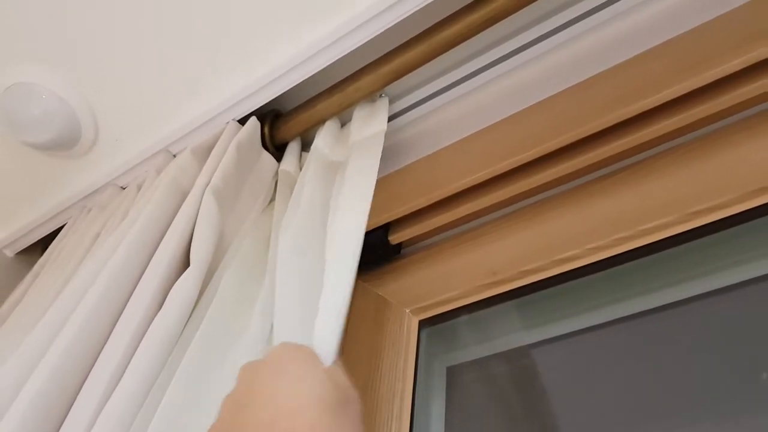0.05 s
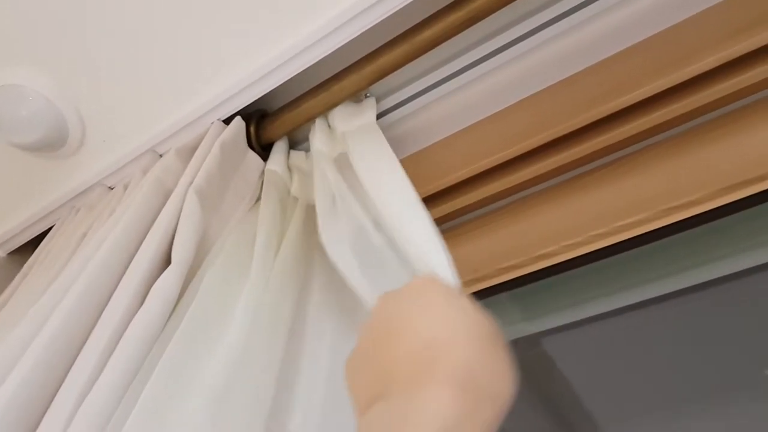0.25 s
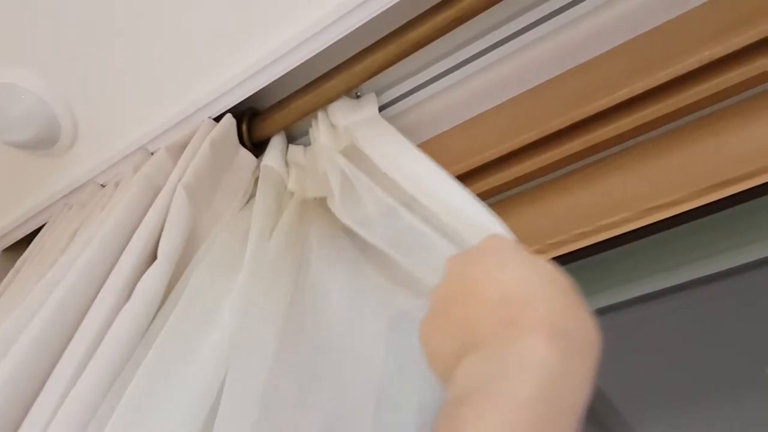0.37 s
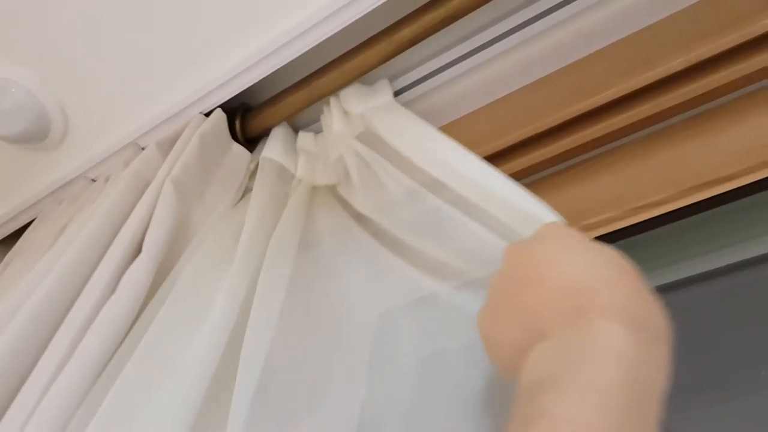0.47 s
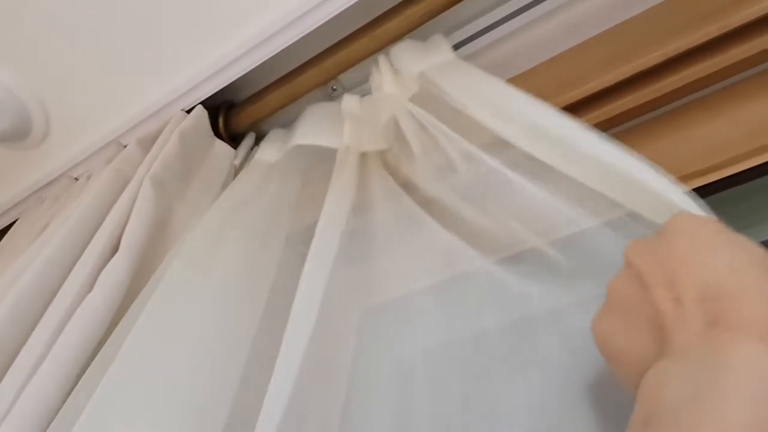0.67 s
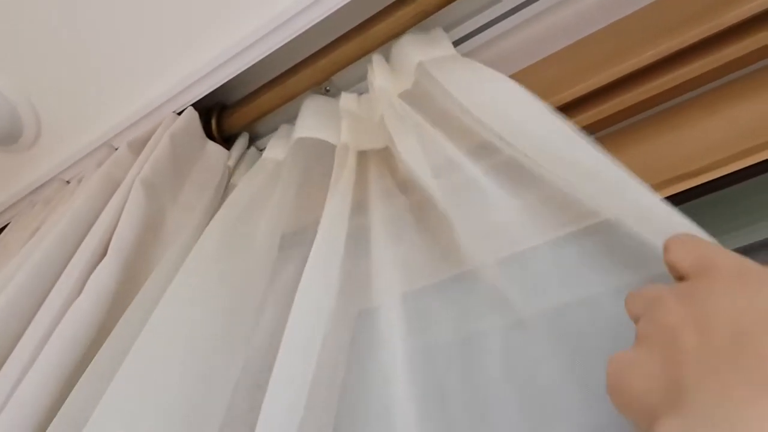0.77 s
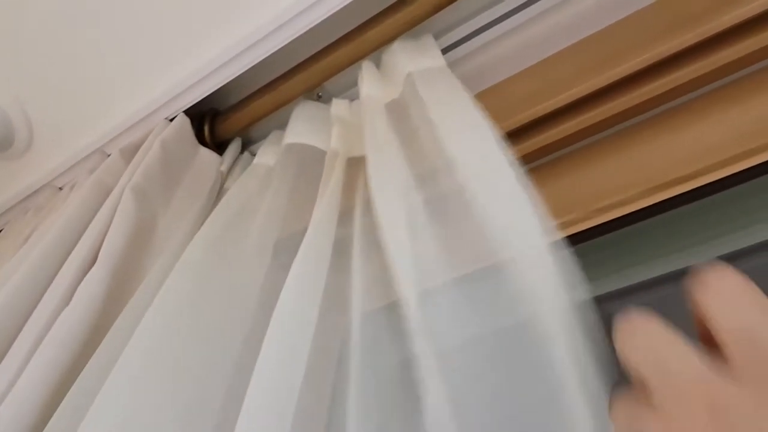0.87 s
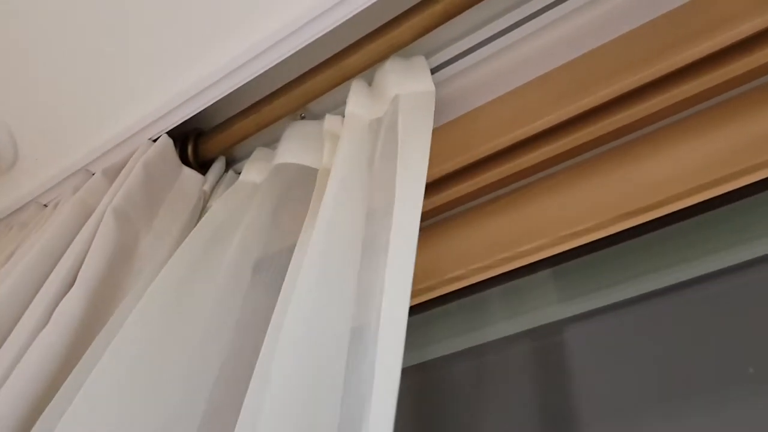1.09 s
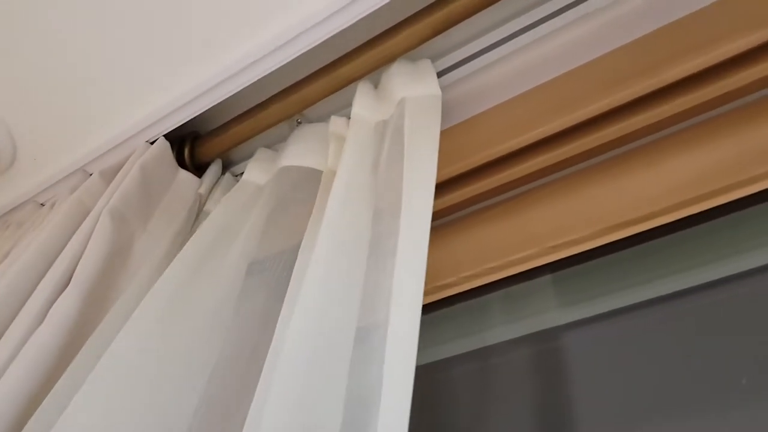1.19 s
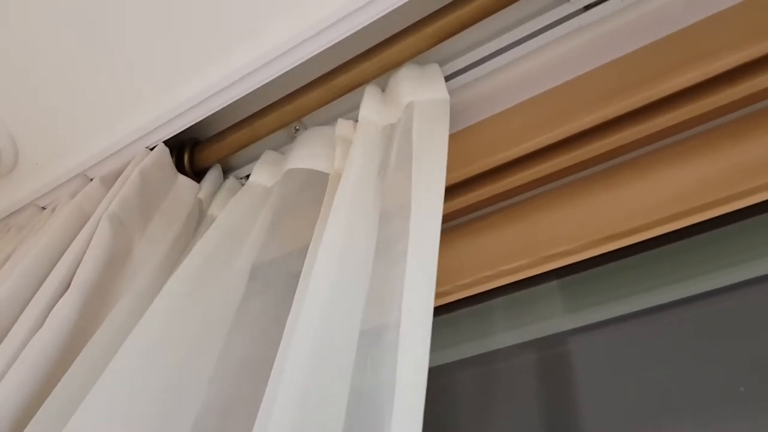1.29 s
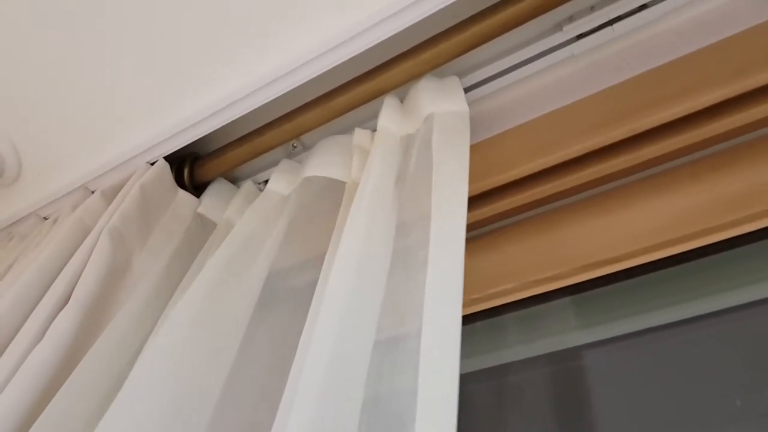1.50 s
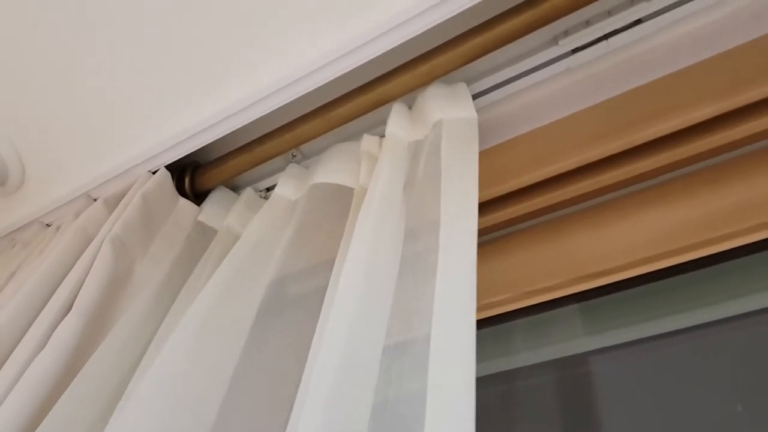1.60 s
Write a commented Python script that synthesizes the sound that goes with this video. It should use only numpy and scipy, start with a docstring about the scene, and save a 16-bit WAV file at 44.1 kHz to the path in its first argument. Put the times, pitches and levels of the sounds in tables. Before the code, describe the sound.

A light curtain is drawn a short way along a wooden rod. It starts with a clack, the hangers scrape and click, then the cloth thuds dully twice and settles with a soft rustle in a quiet room.

```python
"""A quiet, bare room, where a light curtain is drawn a short way along a wooden rod.
It breaks loose with a clack that sets the rod ringing; its hangers scrape along in tiny slips
and click together. The cloth jerks taut and drops back with two dull thuds, the hangers land
on the wood, and the folds sway, rustle and push a little air while the rod hums on."""
import sys
import numpy as np
from scipy import signal
from scipy.fft import rfft, irfft, next_fast_len
from scipy.io import wavfile

SR = 44100
rng = np.random.default_rng(int(sys.argv[2]) if len(sys.argv) > 2 else 0)


def transcribe(u):
    """Save the signal u as a 16-bit wav file named by the first command-line argument.

    u: samples, shape (n,) or (channels, n), limited to [-1, 1]; the rate is SR.
    q: integer samples, one column per channel.
    """
    v = np.clip(np.atleast_2d(u).T, -1, 1)
    q = np.round(v * 32767).astype(np.int16)
    wavfile.write(sys.argv[1], SR, q)


N = 72765
T = np.arange(N) / SR
SIZE = next_fast_len(2 * N, True)
HZ = np.maximum(np.arange(SIZE // 2 + 1) * SR / SIZE, 1)
HANGER_LAG_S = 0.0003  # clicks and scrape arrive later on the left


# the leading hanger snaps free: (time [s], level [dB], pitch [Hz], swell [s])
SNAPS = [(.2245, -31.5, 2700, 0.00016), (.2254, -30, 2410, .00026)]
# its ring-out: (frequency [Hz], level [dB], t60 [s])
SNAP_MODES = [(1625, -38.5, 0.032), (2470, -58, 0.022), (3290, -49.5, 0.039), (4140, -38.5, 0.01),
              (7950, -44, 0.021), (8830, -46, 0.025), (10320, -43.5, 0.017), (16000, -46, 0.0062)]
# two hangers meet and rebound: (time [s], level [dB], pitch [Hz], swell [s])
CLINKS = [(.6866, -29.5, 2700, 0.00031), (.6882, -34, 2220, 0.00038), (.6894, -29.5, 3430, 0.00053)]
# their ring-out: (frequency [Hz], level [dB], t60 [s])
CLINK_MODES = [(1470, -45.5, 0.025), (2430, -45, 0.021), (3140, -38.5, 0.027), (3382, -34.5, 0.02),
               (3560, -49, 0.026), (4480, -41, 0.025), (4870, -47, 0.074), (5141, -40.5, 0.021),
               (7650, -47, 0.035), (8220, -49, 0.029)]

def hanger_clack(contacts, modes):
    """A run of hard contacts; the last one leaves the hanger ringing."""
    last_s = contacts[-1][0]
    return bumps(contacts) + ring(impulse(last_s), modes)


# hanger hits: (time [s], level [dB], decay [s], peak [Hz], emphasis [dB], pan [dB], room send [dB])
CLICKS = [(0.2205, -48.5, 0.0093, 880, 13.5, 0, -3), (0.2237, -33.5, 0.0007, 15200, 11, 4, -17),
          (0.2249, -35, 0.0017, 8850, 10.5, 6.5, 5.5), (0.448, -60, 0.0047, 3250, 1, 14, -9),
          (0.555, -51.5, 0.011, 12600, 19.5, -5, 0), (0.686, -40, 0.0034, 3430, 6, 7, -1),
          (0.751, -45.5, 0.0011, 7460, 17, 4, -12), (0.758, -51.5, 0.016, 4160, 9.5, -9, -13),
          (0.822, -41.5, 0.0024, 10200, 6, -2.5, -27), (1.0458, -55, 0.0016, 9400, 19, 0, 7),
          (1.0547, -48.5, 0.0024, 8100, 14, 2.5, -8), (1.055, -46.5, 0.006, 11700, 3, -7, 10),
          (1.418, -71, 0.0042, 2200, 5, -11, -12)]
# EQ shared by the clicks: (frequency [Hz], gain [dB])
CLICK_EQ = [(40, -32), (150, 0), (450, 2.5), (900, 7), (1350, 1), (2300, 4), (3600, 1), (5100, 0),
            (6300, -9.5), (8000, -8), (10400, -18.5), (11600, -11.5), (16000, -32)]

def hanger_clicks(room):
    """Each hanger chatters for a moment, brightest around a pitch of its own."""
    out = 0
    for s, db, decay_s, hz, emphasis_db, pan_db, send_db in CLICKS:
        bell = 1 / (1 + (np.log2(HZ / hz) / 0.25) ** 2)  # a quarter octave to each side
        boost_db = 10 * np.log10(1 + (from_db(emphasis_db) * bell) ** 2)
        chatter = burst(s, rise_s=0.0001, decay_s=decay_s)
        click = from_db(db) * colour(chatter, at_hz(CLICK_EQ), boost_db)
        out = out + in_room(click, room, send_db, pan_db, HANGER_LAG_S)
    return out


# friction envelope of the hangers: (time [s], level [dB])
SCRAPE_ENVELOPE = [(.21, -100), (.235, -86), (.27, -54.5), (.33, -60.5), (.41, -58), (.45, -54.5),
                   (.51, -58.5), (.60, -55.5), (.68, -54.5), (.745, -50.5), (.795, -48), (.83, -91),
                   (.98, -99), (1.25, -99), (1.44, -68), (1.65, -117)]
# tone of the scrape: (frequency [Hz], gain [dB])
SCRAPE_EQ = [(200, 3), (500, 9.5), (1000, 6), (1800, 6), (3300, 0), (5100, -0.5), (6200, -14.5),
             (8200, -10.5), (12500, -22), (16000, -58)]

def hanger_scrape(slips_per_s=3500, spread_db=3.5):
    """The hangers move along the rod in dense, tiny slips of uneven size."""
    sizes = from_db(spread_db * np.minimum(rng.exponential(1, N), 5))
    signs = rng.choice([-1, 1], N)
    slipping = rng.random(N) < slips_per_s / SR
    slips = rms_one(sizes * signs * slipping)
    return colour(slips * envelope(SCRAPE_ENVELOPE), at_hz(SCRAPE_EQ))


# knocks on the rod: (time [s], level [dB], hardness as low-pass cutoff [Hz])
KNOCKS = [(.097, -46.5, 304), (0.204, -46.5, 328), (0.2232, -28.5, 990), (0.262, -42, 217),
          (.428, -41, 263), (0.721, -35, 122), (0.798, -49, 800), (1.074, -43.5, 905)]
# body of the rod on its brackets: (frequency [Hz], level [dB], t60 [s])
ROD_MODES = [(104, -10.5, 0.28), (132.9, -6, 0.38), (160.4, -10.5, 0.59), (324, -5, 0.041),
             (391, -4, 0.102), (440.3, -6.5, 0.29), (520, -11, 0.2), (745, -18, 0.15), (842, -19, 0.34),
             (976, -9, 0.079)]

def rod_knocks(low_cut_hz=79.5):
    """Every knock rings the same low modes; soft contacts reach mainly the lowest."""
    force = sum(from_db(db) * butter(impulse(s) + 1e-18, top_hz) for s, db, top_hz in KNOCKS)
    return butter(ring(force, ROD_MODES), low_cut_hz, "high")


# jerks and flaps: (time [s], level [dB], rise [s], decay [s], treble tilt [dB/octave])
THUDS = [(0.105, -50.5, 0.0072, 0.019, -21), (0.701, -45.5, 0.015, 0.011, -5),
         (0.801, -32, 0.0077, 0.011, -0.5), (0.924, -44.5, 0.013, 0.011, -10),
         (1.034, -44.5, 0.0013, 0.016, -6.5), (1.056, -39, 0.0042, 0.017, 1.5),
         (1.08, -34, 0.0064, 0.014, -3.5), (1.115, -46.5, 0.01, 0.059, 2.5),
         (1.373, -55, 0.0022, 0.027, -4.5), (1.504, -50.5, .012, 0.02, -10)]
# dark tone of a thud: (frequency [Hz], gain [dB])
THUD_EQ = [(30, -33), (60, -36.5), (120, -0.5), (220, 1), (340, 3.5), (500, 2.5), (700, -7.5),
           (1400, -13.5), (2400, -18.5), (3000, -30.5), (5000, -31), (6300, -39.5), (12000, -50),
           (16000, -56)]

def cloth_thuds(tilt_from_hz=372):
    """Dull bursts as the cloth pulls at its hangers, each with its own brightness."""
    octaves_up = np.log2(np.maximum(HZ / tilt_from_hz, 1))
    return sum(from_db(db) * colour(burst(s, rise_s, decay_s), at_hz(THUD_EQ), tilt * octaves_up)
               for s, db, rise_s, decay_s, tilt in THUDS)


# punch under the two big thuds: (time [s], level [dB], pitch [Hz], swell [s])
TUGS = [(.7875, -31.5, 331, 0.0027), (.7985, -31.5, 347, 0.0028), (.8155, -39.5, 286, 0.0033),
        (1.074, -38.5, 475, 0.0067)]

def cloth_tugs():
    """Jerked taut or falling back, the cloth tugs the rod in quick, pitched thumps."""
    return bumps(TUGS)


# hangers dropping onto the rod: (time [s], level [dB])
LANDINGS = [(1.0555, -51.5), (1.0615, -47), (1.076, -42.5)]
# woody ring under them: (frequency [Hz], level [dB], t60 [s])
WOOD_MODES = [(214.7, -3, 0.29), (290, -7, 0.4), (376, 3.5, 0.44), (515, 2.5, 0.17), (640, -4.5, 0.18),
              (1056, -16, 0.18), (1214, -18.5, 0.39), (1560, -12, 0.21), (2330, -18.5, 0.25),
              (3870, -15, 0.18)]

def hanger_landings():
    """The hangers fall back one after another and knock on the wood."""
    force = sum(from_db(db) * impulse(s) for s, db in LANDINGS)
    return ring(force, WOOD_MODES)


# swells of the swaying cloth: (time [s], level [dB])
RUSTLE_ENVELOPE = [(.07, -87.5), (.12, -64), (.19, -71.5), (.25, -46), (.40, -57.5), (.46, -48.5),
                   (.60, -55), (.75, -45.5), (.87, -53.5), (1.01, -57), (1.16, -61), (1.27, -53.5),
                   (1.42, -55.5), (1.56, -58), (1.65, -54.5)]
# soft, muffled tone of the folds: (frequency [Hz], gain [dB])
RUSTLE_EQ = [(30, -26), (60, -26), (95, -9), (125, -1), (165, -4), (200, 0), (280, -2.5), (400, 2.5),
             (520, -8.5), (680, -8), (900, -27.5), (1600, -32), (5000, -35)]

def cloth_rustle(flutter_hz=28, flutter_db=0.5):
    """Folds rub past each other in a low, slightly fluttering rustle."""
    flutter = rms_one(butter(rng.standard_normal(N), flutter_hz))
    rustle = colour(diffuse_noise(), at_hz(RUSTLE_EQ)) * from_db(-flutter_db * flutter)
    return rms_one(rustle) * envelope(RUSTLE_ENVELOPE)


# swell and fade of the hum: (time [s], rms level [dB])
HUM_ENVELOPE = [(.66, -102), (.80, -51), (.90, -58), (1.0, -63), (1.10, -59), (1.40, -55.5), (1.46, -64),
                (1.65, -71)]

def rod_hum(hz=165):
    """One low mode of the rod sings on as the weight settles on it."""
    return np.sqrt(2) * envelope(HUM_ENVELOPE) * np.sin(2 * np.pi * hz * T)


# how hard the settling hangers rub: (time [s], level [dB])
RUB_ENVELOPE = [(.3, -111), (.7, -58), (.9, -56), (1.1, -56.5), (1.40, -56.5), (1.52, -57.5), (1.65, -54)]
# resonances the rubbing keeps alive: (frequency [Hz], half-width [Hz], level [dB])
RUB_TONES = [(406, 12, -4.5), (4960, 220, -28)]

def rod_rubbing():
    """Light friction makes the rod hum and whisper in narrow resonances."""
    out = 0
    for hz, width_hz, db in RUB_TONES:
        resonance = 1 / (1 + ((HZ - hz) / width_hz) ** 2)
        band = irfft(rfft(rng.standard_normal(SIZE)) * resonance, SIZE)[:N]
        out = out + from_db(db) * rms_one(band)
    return out * envelope(RUB_ENVELOPE)


# puffs of air from the sweeping folds: (time [s], level [dB])
WAFT_ENVELOPE = [(.02, -74), (.08, -77), (.115, -55.5), (.18, -71), (.37, -68), (.45, -56.5), (.52, -65),
                 (.69, -66), (.745, -62), (.81, -62.5), (1.0, -60.5), (1.1, -74), (1.16, -52.5),
                 (1.26, -73), (1.5, -78)]
# their bass weight: (frequency [Hz], gain [dB])
WAFT_EQ = [(25, -36), (45, -12), (60, -2.5), (85, 5.5), (115, 1.5), (250, -54)]

def air_waft():
    """Deep flutter of air as the cloth swings out and falls back."""
    return colour(rng.standard_normal(N), at_hz(WAFT_EQ)) * envelope(WAFT_ENVELOPE)


# drag of the curtain's heading tape: (time [s], level [dB])
TAPE_ENVELOPE = [(.40, -81), (.552, -65), (.557, -61.5), (.59, -64), (.65, -64.5), (.76, -76), (.82, -100)]
# its airy top end: (frequency [Hz], gain [dB])
TAPE_EQ = [(3000, -12), (7000, 1), (11000, 2.5), (12800, 7), (14000, -11), (16000, -10)]

def heading_tape():
    """The heading tape catches and then drags with a thin hiss."""
    return colour(rng.standard_normal(N) * envelope(TAPE_ENVELOPE), at_hz(TAPE_EQ))


# background bed: (frequency [Hz], gain [dB])
ROOM_TONE_EQ = [(20, -15), (65, -18), (130, 3.5), (300, -15), (800, -14.5), (2500, -15.5), (8000, -24.5),
                (13000, -22.5), (16000, -19)]

def room_tone(level_db=-73):
    """Steady low room tone with faint microphone hiss."""
    return from_db(level_db) * colour(diffuse_noise(), at_hz(ROOM_TONE_EQ))


# reverb time of the bare room: (frequency [Hz], t60 [s])
ROOM_T60 = [(100, 0.79), (300, 0.25), (1500, 0.53), (5000, 0.48), (13000, 0.63)]

def room_response(predelay_s=0.00092, build_s=0.003):
    """Reflections build quickly into a diffuse tail that dies octave by octave."""
    spectrum, tail = rfft(diffuse_noise(), SIZE), 0
    octaves = np.arange(6, 15)  # 64 Hz to 16 kHz
    for octave, pick in zip(octaves, np.eye(len(octaves))):
        band = irfft(spectrum * np.interp(np.log2(HZ), octaves, pick), SIZE)[:, :N]
        tail = tail + band * decay(at_hz(ROOM_T60, 2.0 ** octave))
    onset = np.clip((T - predelay_s) / build_s, 0, 1)
    return rms_one(tail * onset) / np.sqrt(N)


# stereo image of diffuse sound: (frequency [Hz], left-right correlation [-1 to 1])
CORRELATION = [(60, 0.25), (150, 0.99), (300, 0.9), (550, 0.57), (1000, 0.034), (2000, -0.17),
               (4000, -0.054), (9000, -0.15), (16000, 0.15)]

def diffuse_noise():
    """White stereo noise, alike in the bass and nearly unrelated in the treble."""
    mid, side = rfft(rng.standard_normal((2, SIZE)))
    alike = at_hz(CORRELATION)
    spectrum = np.sqrt((1 + alike) / 2) * mid + np.sqrt((1 - alike) / 2) * side * [[1], [-1]]
    return irfft(spectrum, SIZE)[:, :N]


def in_room(x, room, send_db, pan_db, lag_s=0):
    """Panned direct sound, late on the left by lag_s, plus its reverb."""
    left = np.interp(T - round(lag_s * SR) / SR, T, x)
    reverb = signal.fftconvolve(x[None], room, axes=1)[:, :N]
    return pan(np.array([left, x]), pan_db) + from_db(send_db) * reverb


def bumps(contacts):
    """Each contact swells and dies within a few cycles of its own pitch."""
    out = 0
    for s, db, hz, swell_s in contacts:
        age = np.maximum(T - s, 0)
        swell = age / swell_s * np.exp(1 - age / swell_s)
        out = out + from_db(db) * swell * np.sin(2 * np.pi * hz * age)
    return out


def burst(s, rise_s, decay_s):
    """A flurry of tiny contacts that swells to time s and dies away."""
    shape = np.exp(np.minimum((T - s) / rise_s, (s - T) / decay_s))
    return rms_one(shape * rng.standard_normal(N)) * np.sqrt(np.mean(shape ** 2))


def ring(force, modes):
    """A force drives damped modes; neighbours swing in opposite directions."""
    response = sum((-1) ** k * from_db(db) * np.cos(2 * np.pi * hz * T) * decay(t60)
                   for k, (hz, db, t60) in enumerate(modes))
    return signal.fftconvolve(force, response)[:N]


def colour(x, curve_db, boost_db=0):
    """Causal EQ that follows a dB curve at unit power gain, with an optional boost on top."""
    gain = rms_one(from_db(curve_db)) * from_db(boost_db)
    cepstrum = irfft(np.log(gain + 1e-9), SIZE)
    cepstrum[1:SIZE // 2] *= 2  # minimum phase keeps the attacks sharp
    cepstrum[SIZE // 2 + 1:] = 0
    return irfft(rfft(x, SIZE) * np.exp(rfft(cepstrum)), SIZE)[..., :N]


def butter(x, hz, kind="low"):
    """Second-order low-pass or high-pass."""
    return signal.sosfilt(signal.butter(2, hz, kind, fs=SR, output="sos"), x)


def impulse(s):
    """A unit blow at time s."""
    return signal.unit_impulse(N, int(s * SR))


def decay(t60):
    """Fade by 60 dB every t60 seconds."""
    return np.exp(-np.log(1000) * T / t60)


def envelope(points):
    """Gain over time from (time [s], level [dB]) points."""
    return from_db(np.interp(T, *np.transpose(points)))


def at_hz(points, hz=HZ):
    """Read a table on a log-frequency axis."""
    freqs, values = np.transpose(points)
    return np.interp(np.log(hz), np.log(freqs), values)


def pan(x, pan_db):
    """Positive values lean a sound to the left."""
    return x * from_db([[pan_db], [-pan_db]])


def from_db(db):
    """Decibels to gain."""
    return 10 ** (np.asarray(db) / 20)


def rms_one(x):
    """Scale to unit rms."""
    return x / np.sqrt(np.mean(x ** 2) + 1e-20)


def scene():
    """Hangers, rod and cloth in the room, over the room tone."""
    room = room_response()
    hangers = hanger_clicks(room)
    hangers += in_room(hanger_scrape() + heading_tape(), room, send_db=2.5, pan_db=2.3, lag_s=HANGER_LAG_S)
    hangers += in_room(hanger_clack(SNAPS, SNAP_MODES), room, send_db=0.5, pan_db=0)
    hangers += in_room(hanger_clack(CLINKS, CLINK_MODES), room, send_db=-1.5, pan_db=-1.5, lag_s=5e-5)
    rod = in_room(rod_knocks(), room, send_db=-4.5, pan_db=1.6)
    rod += in_room(hanger_landings(), room, send_db=-0.5, pan_db=3.5)
    rod += pan(rod_rubbing() + rod_hum(), pan_db=1.5)
    cloth = in_room(cloth_thuds(), room, send_db=-0.5, pan_db=1.35)
    cloth += in_room(cloth_tugs(), room, send_db=-5.5, pan_db=1.35)
    cloth += pan(cloth_rustle(), pan_db=0.5) + pan(air_waft(), pan_db=1.9)
    return hangers + rod + cloth + room_tone()


def record(dry, cutoff_hz=16000):
    """A steep high cut on the whole mix."""
    return irfft(rfft(dry, SIZE) / np.sqrt(1 + (HZ / cutoff_hz) ** 200), SIZE)[:, :N]


dry = scene()
out = record(dry)
transcribe(out)
```